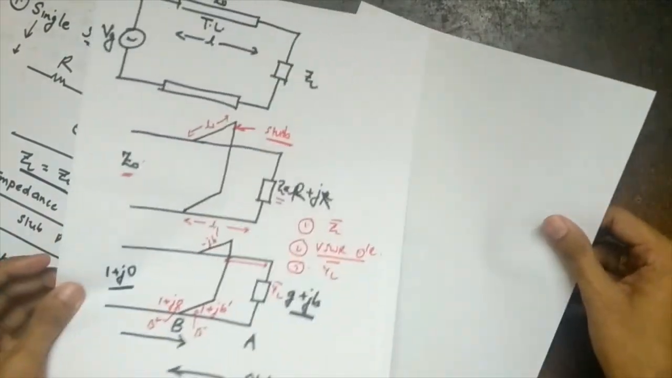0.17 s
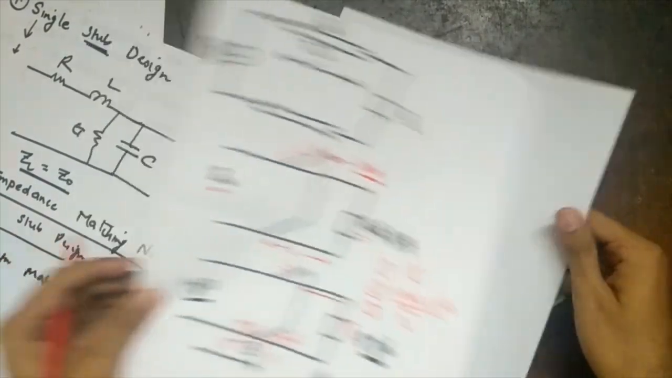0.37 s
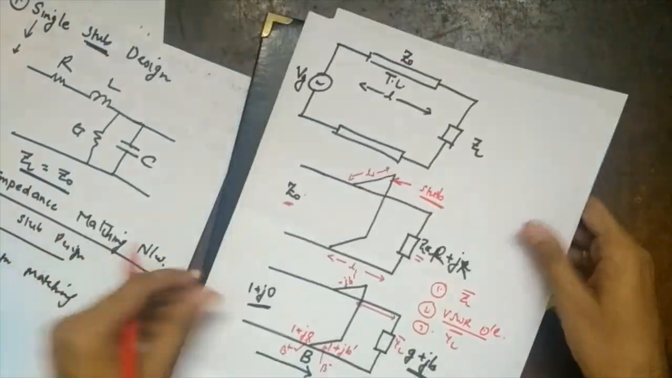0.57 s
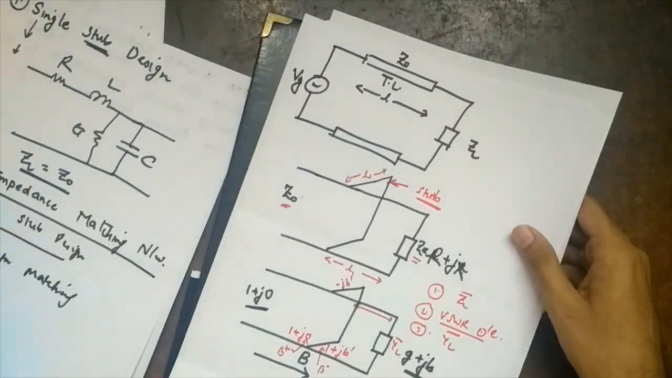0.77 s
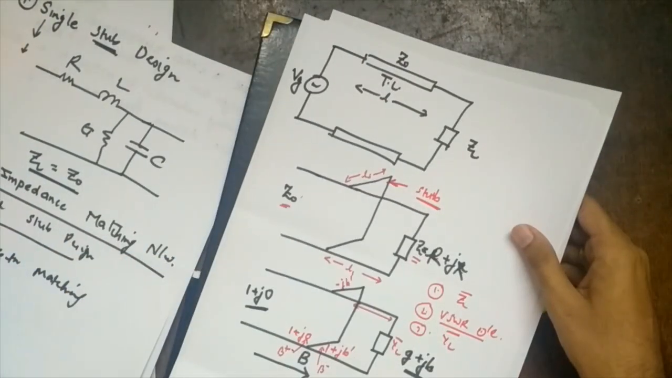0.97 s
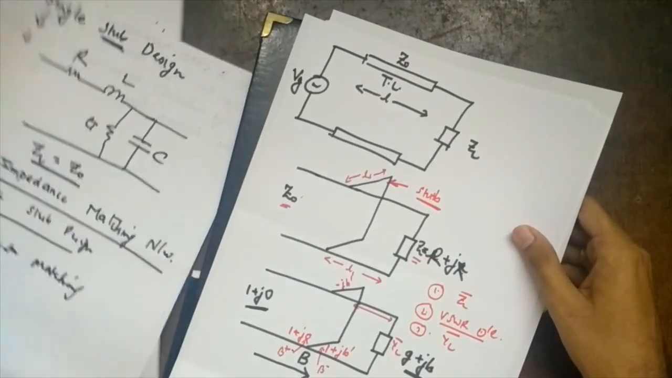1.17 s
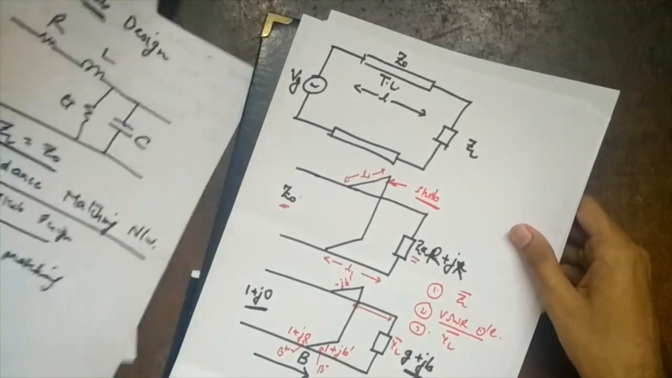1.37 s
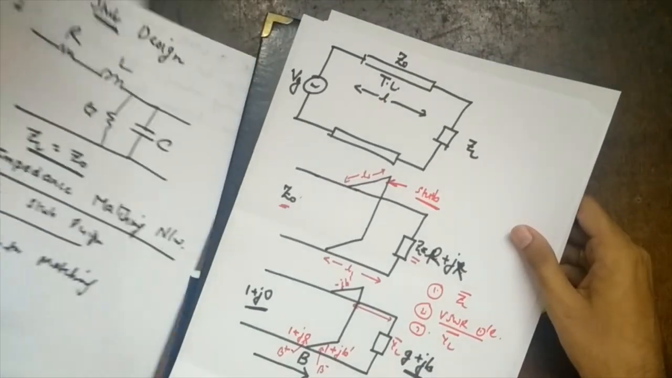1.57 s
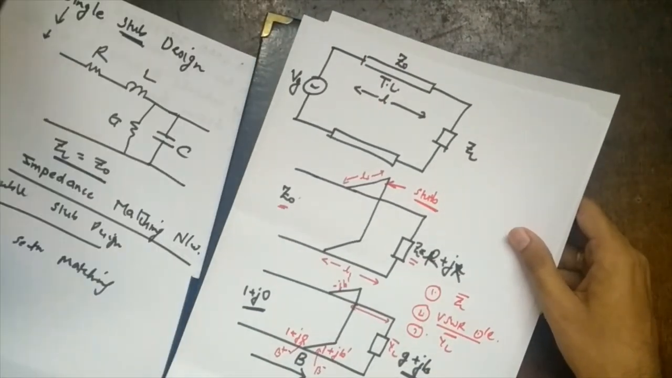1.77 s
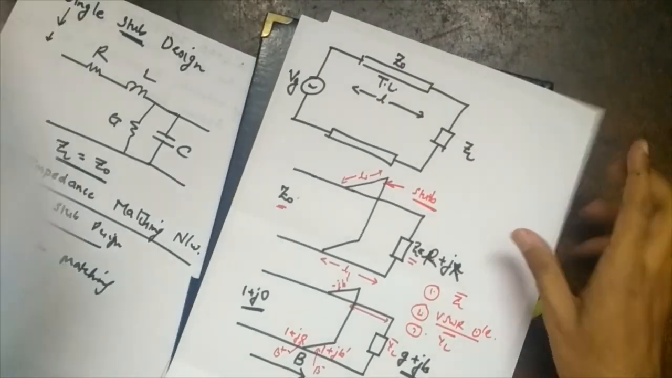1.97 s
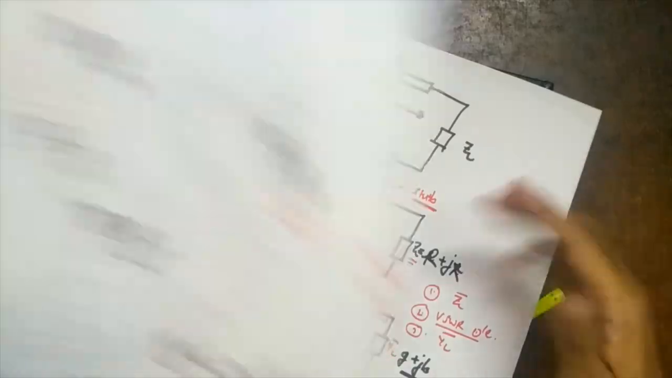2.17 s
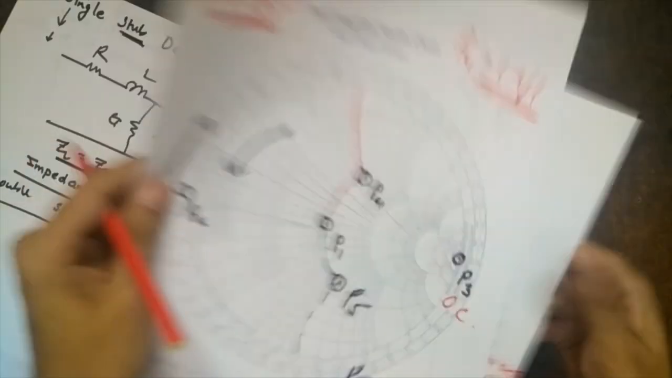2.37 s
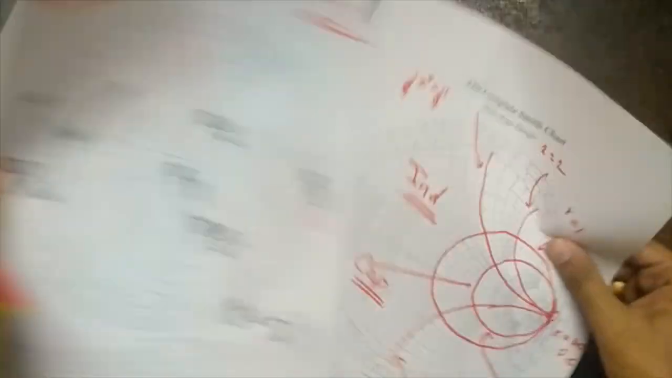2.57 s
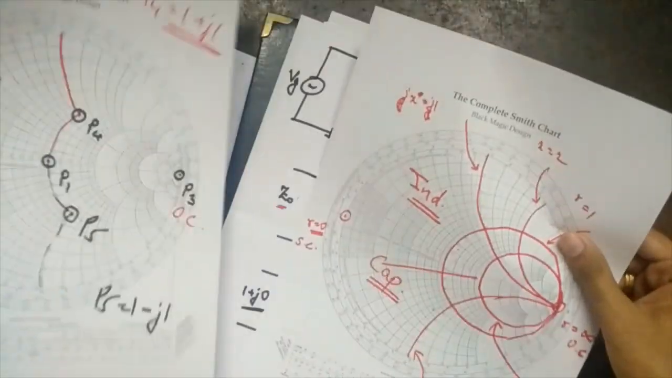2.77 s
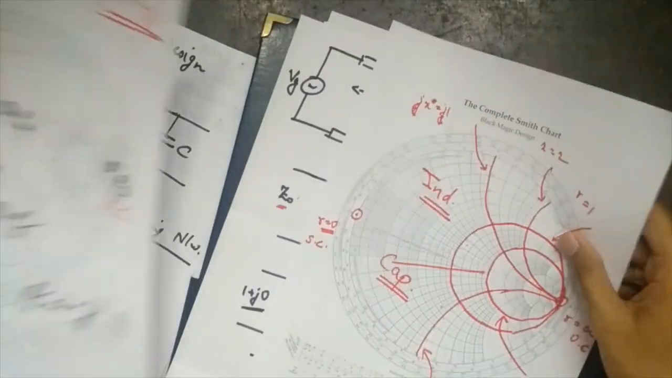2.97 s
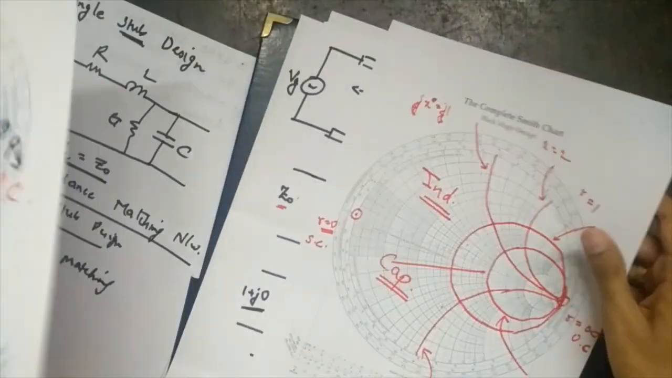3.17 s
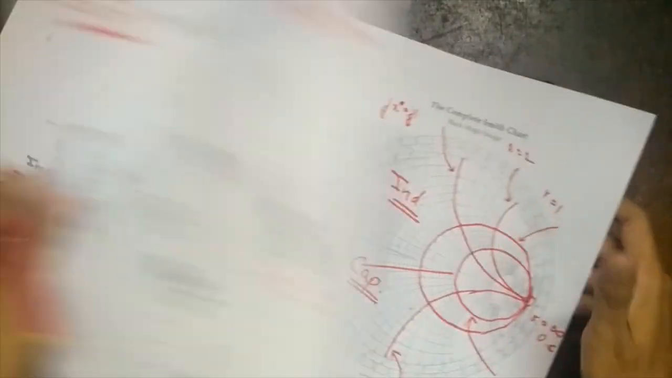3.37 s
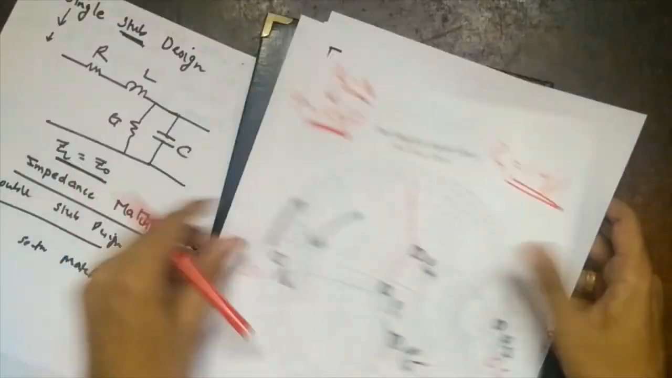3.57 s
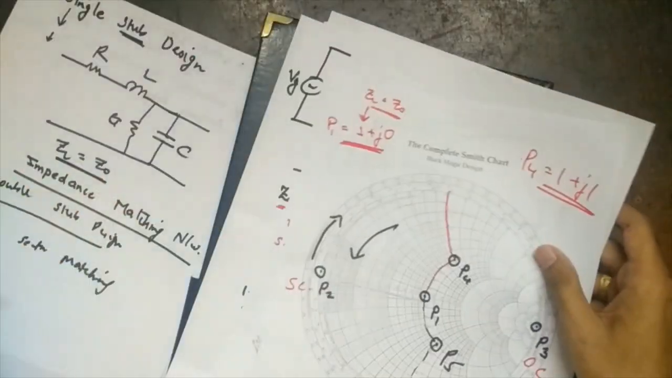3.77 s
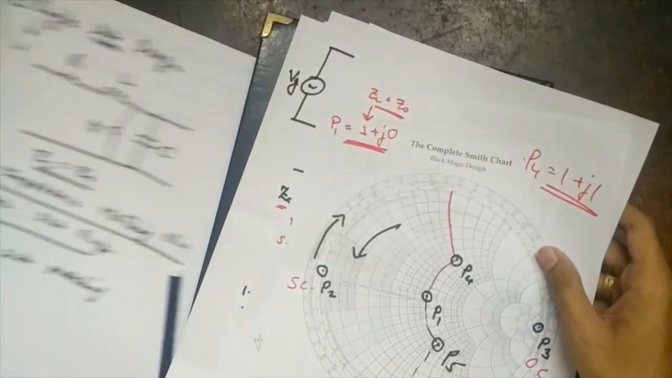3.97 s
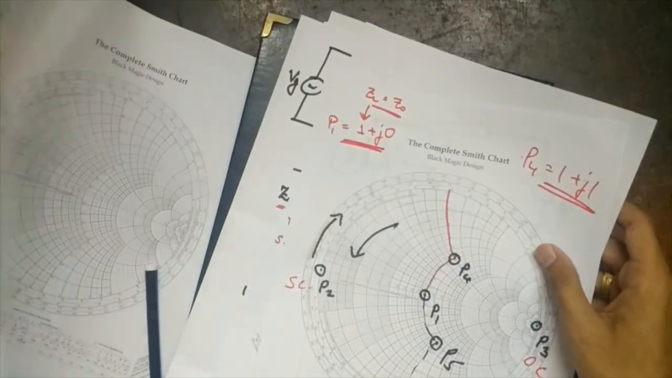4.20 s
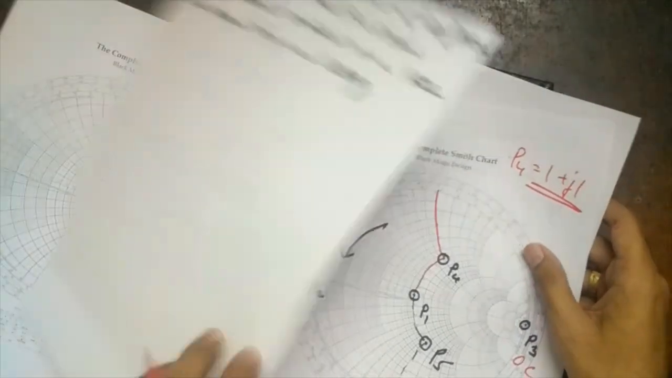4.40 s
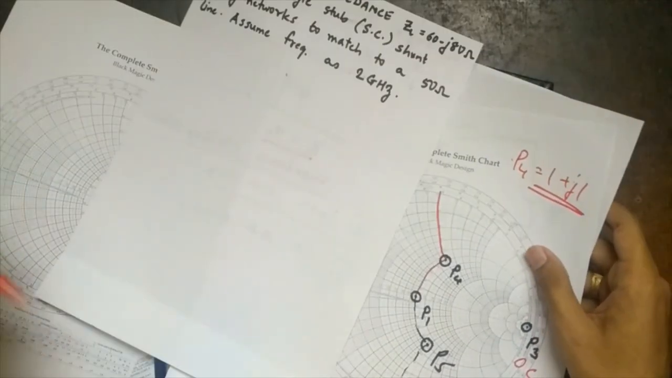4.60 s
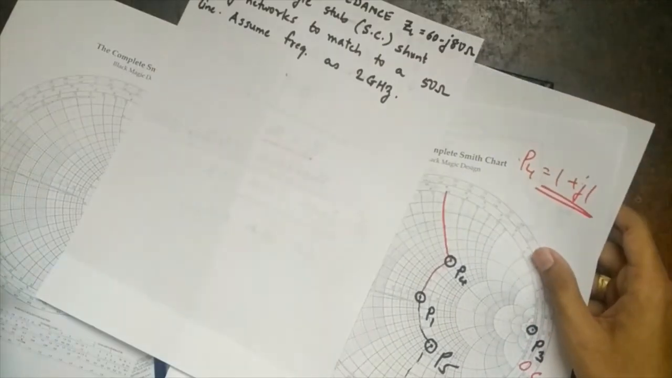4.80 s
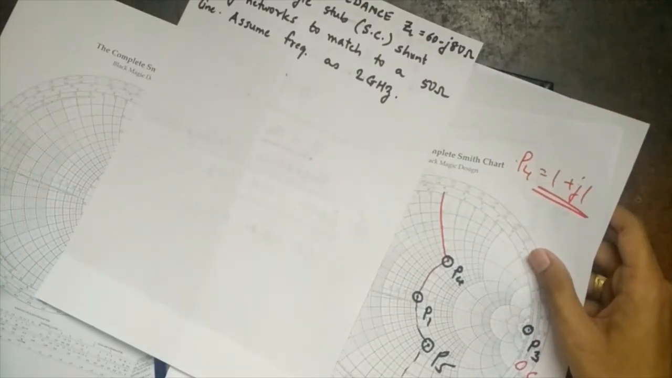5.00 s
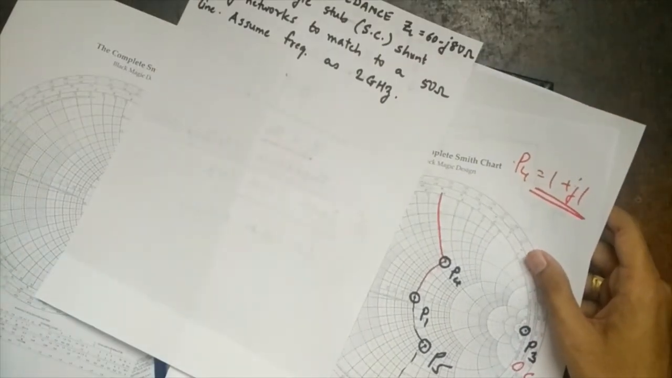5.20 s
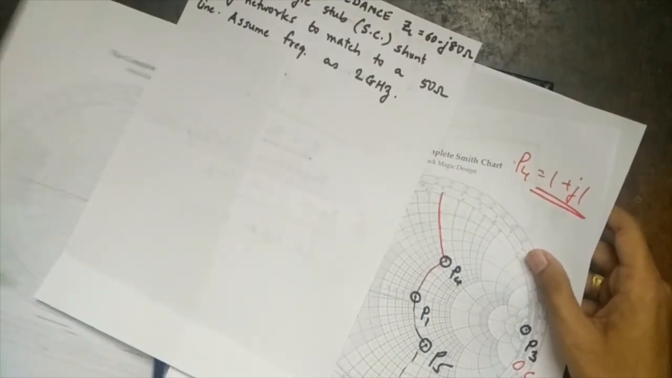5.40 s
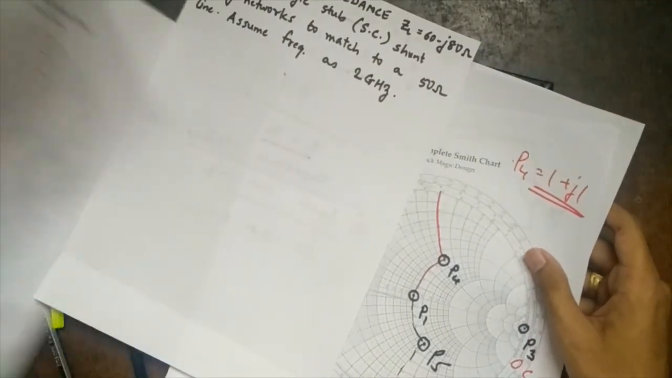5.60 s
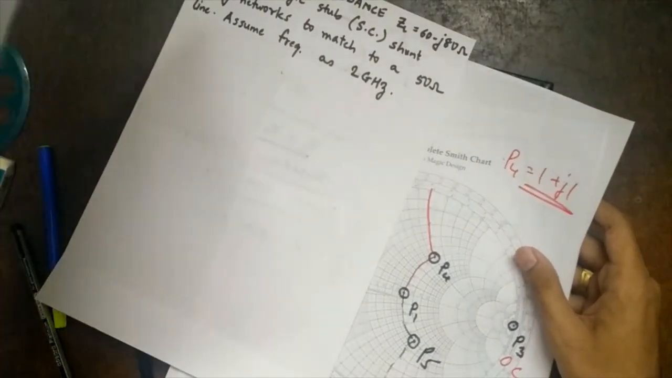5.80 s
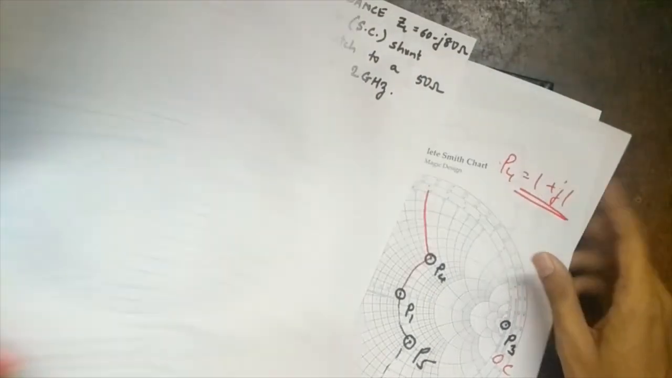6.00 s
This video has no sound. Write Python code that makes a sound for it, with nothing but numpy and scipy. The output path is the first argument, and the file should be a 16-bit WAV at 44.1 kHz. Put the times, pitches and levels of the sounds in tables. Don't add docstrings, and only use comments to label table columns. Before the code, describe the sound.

Close paper shuffling: sharp crackles and airy treble rustles come in bursts, with soft desk thuds and quiet gaps over faint room noise.

```python
import sys
import numpy as np
from scipy import signal
from scipy.fft import rfft, irfft, next_fast_len
from scipy.io import wavfile
from scipy.ndimage import uniform_filter1d

SR = 44100
rng = np.random.default_rng(int(sys.argv[2]) if len(sys.argv) > 2 else 0)


def wav_out(sig):
    wavfile.write(sys.argv[1], SR, np.round(np.clip(np.atleast_2d(sig).T, -1, 1) * 32767).astype(np.int16))


def elevation(decibels):
    levels = np.asarray(decibels, float)
    return 10 ** (levels / 20)


N = 266805

RUB_EDGES_HZ = [5000, 7700, 9500, 12700, 15800]
FLEX_EDGES_HZ = [5000, 3300, 2000, 1000, 330]


def rub():
    # pitch_hz, level_db
    microphone = [(4000, 2.5), (5000, 3.5), (5700, 0.5), (7000, -2), (12500, -0.5), (13500, -8.5),
                  (15800, -2.5)]
    drive = slips(per_s=4300, spread_db=3.0, clump_db=1.35, smooth=1.3, clump_s=0.012)
    return banded(coloured(drive, microphone), rubbing(), RUB_EDGES_HZ, patchy_db=2.5, soft=2)


def rubbing():
    # start_s, level_db, fall_20db_s, tilt_db_per_octave
    rub_flicks = [(0.0, -47.5, 0.2911, -2.5), (.385, -54, 0.2555, -16), (1.145, -57, 0.12, -6.5),
                  (1.375, -52.5, 0.18, -4), (2.405, -58, -0.4, 2), (2.472, -44.5, 0.0646, -1.5),
                  (2.645, -44.5, 0.17, 3), (2.944, -56.5, 0.22, 3), (3.11, -53, 0.09, 3),
                  (3.585, -56.5, 0.15, -9), (3.932, -56, 0.19, 8.5), (4.425, -44.5, 0.0943, -13),
                  (4.552, -43.5, 0.04, 3), (4.823, -69.5, 0.1, 3), (5.12, -55, 0.17, 3.5),
                  (5.369, -49.5, 0.14, -3.5), (4.595, -52, 0.04, 4), (6.004, -70.5, -2, 3)]
    # top_speed_s, level_db, rise_20db_s, fall_20db_s, tilt_db_per_octave
    rub_slides = [(.33, -56, 0.09, 0.03, -10), (.24, -58, 5, 0.13, -19.5), (1.035, -63.5, .025, 0.25, -4),
                  (1.28, -52.5, 0.0245, 0.11, 4), (3.842, -61.5, -0.04, 0.2, 0),
                  (5.278, -56, 0.04, 0.04, 1.5), (2.02, -59.5, 0.1935, 0.0114, 2),
                  (0.041, -42.5, 5, 0.1735, 4.5), (0.507, -39.5, 0.0666, 0.112, -1),
                  (.6, -54.5, 0.5, 0.0846, -7.5), (1.061, -59.5, 0.0187, 0.15, 3.5),
                  (1.21, -57, 0.0422, 0.28, -25), (1.468, -49.5, 0.0842, 0.17, 0),
                  (1.762, -45, 0.1038, 0.14, 8), (1.891, -43, 0.152, 0.0863, 0),
                  (2.241, -74.5, 0.16, 0.12, -1), (2.455, -57.5, 0.0313, -0.2, 0),
                  (2.544, -41.5, 0.09, 0.1062, 0.5), (2.765, -53.5, .08, -0.01, -1.5),
                  (2.989, -54, -0.09, 0.15, -2), (3.345, -55, 0.03, 0.296, -12.5),
                  (3.49, -59.5, 0.24, .07, -20), (3.745, -66, 0.04, 0.15, -8.5),
                  (3.876, -57, -0.05, 0.14, -1), (3.96, -52.5, -0.02, 0.11, 5),
                  (4.1, -53.5, 0.1513, 0.15, 9.5), (4.202, -50.5, 0.145, 0.08, 12),
                  (5.422, -44, 0.04, 0.0952, -2), (5.63, -42.5, 0.1738, 0.1341, -1),
                  (5.73, -45, 0.0736, 0.0754, -0.5), (5.955, -68, 0.3, -0.01, -2)]
    rub_bands_db = [-0.5, -3, -2.5, -7.5]
    return strokes(rub_flicks, rub_slides, rub_bands_db, RUB_EDGES_HZ, dulls_db=4.5)


def slips(per_s, spread_db, clump_db, smooth, clump_s):
    width = int(clump_s * SR)
    clumps = evened(uniform_filter1d(uniform_filter1d(rng.standard_normal(N), width), width))
    size = elevation(spread_db * np.minimum(rng.exponential(1, N), 4))
    clicks = size * rng.choice([-1., 1.], N) * (rng.random(N) < per_s / SR)
    return elevation(clump_db * clumps) * (evened(clicks) + smooth * rng.standard_normal(N))


def strokes(flicks, slides, bands_db, edges_hz, dulls_db):
    t = np.arange(N // 64 + 5) * 64 / SR
    rise_s = 0.0051
    sudden = [(s, db, rise_s, fall_s, tilt) for s, db, fall_s, tilt in flicks]
    down_db = np.vstack([fading(sudden, t, bend=1.13), fading(slides, t, bend=1.22)])
    rows = np.array([row[1::3] for row in sudden + slides])
    centres = np.multiply(edges_hz[1:], edges_hz[:-1])
    octaves = np.log2(centres / edges_hz[0] / edges_hz[1])[:, None, None] / 2
    tilt = rows[:, 1:] - dulls_db * np.minimum(down_db, 60) / 20
    shares = elevation(2 * (np.array(bands_db)[:, None, None] + tilt * octaves))
    power = elevation(2 * np.maximum(rows[:, :1] - down_db, -150))
    return (shares / shares.sum(0) * power).sum(1)


def fading(rows, t, bend):
    s, rise_s, fall_s = (np.array([row[k] for row in rows])[:, None] for k in (0, 2, 3))
    return 20 * abs((t - s) / np.where(t < s, abs(rise_s), abs(fall_s))) ** bend


def banded(drive, shares, edges_hz, patchy_db, soft):
    hz, t, z = signal.stft(drive, SR, nperseg=256, noverlap=192)
    power = np.zeros(z.shape)
    for share, a, b in zip(shares, edges_hz, edges_hz[1:]):
        inside = (hz >= min(a, b)) & (hz < max(a, b))
        power[inside] = share[:len(t)] * SR / 2 / abs(b - a)
    patches = uniform_filter1d(rng.standard_normal(z.shape), 4, 0)
    patches = evened(uniform_filter1d(uniform_filter1d(patches, 30, 1), 30, 1))
    gain = np.sqrt(abs(uniform_filter1d(power, soft, 0))) * elevation(patchy_db * patches)
    return signal.istft(z * gain, SR, nperseg=256, noverlap=192)[1][:N]


def flex():
    # start_s, level_db, fall_20db_s, tilt_db_per_octave
    flex_flicks = [(0.0, -58, 0.1078, -1), (.385, -45, 0.0637, 6), (1.14, -54, 0.03, 3.5),
                   (1.268, -60, 0.186, -1.5), (2.208, -64, -0.02, -9.5), (2.472, -46, 0.0374, -3.5),
                   (2.643, -56, 0.067, -3), (2.8, -63.5, .04, -4.5), (2.945, -65.5, 0.26, 3.5),
                   (3.296, -57.5, 0.1, 2), (3.581, -55.5, 0.06, -3), (4.356, -70, .05, -2),
                   (4.426, -42.5, 0.0624, 2.5), (3.567, -57, 0.01, -3), (4.557, -57.5, 0.11, 0.5),
                   (5.122, -66, 0, 2), (5.271, -63.5, -0.1, 4), (5.382, -55, 0.08, 10),
                   (5.367, -57, 0.06, 1), (1.805, -53.5, 0.09, 1), (.749, -67.5, 0.08, 0),
                   (5.46, -56.5, 0, 6.5)]
    # most_bent_s, level_db, rise_20db_s, fall_20db_s, tilt_db_per_octave
    flex_slides = [(.12, -60.5, -4.25, 0.23, 14.5), (0.5203, -56, 0, 0.11, 3), (1.055, -65, 0.03, 0.14, -2),
                   (1.11, -68, 0.1, 0.16, 0.5), (1.3, -62.5, 0.13, .15, 4.5),
                   (1.8774, -47.5, 0.0832, 0.0924, 0.5), (2.44, -76, -1.5, -0.2, -8.5),
                   (2.537, -45, 0.052, 0.09, -4.5), (2.72, -61.5, 0.12, 0.13, 5.5),
                   (3.0, -60.5, 0.0366, 0.19, -3), (3.8, -67, 0.3, 0.26, 3), (3.98, -68, .1, 0.27, -2),
                   (4.21, -65, 0.3, 0.08, 3.5), (4.07, -67, 0.53, 0.32, -10.5),
                   (4.49, -54.5, 0.0744, 0.0054, 5), (4.895, -76.5, 0.5, 0.3, -1),
                   (5.69, -52.5, 0.13, 0.12, 1.5), (5.93, -65, 0.1442, -0.5, -4.5),
                   (4.4, -64.5, 0.04, .08, 5), (3.72, -73, 0.2, 0.3, -7), (2.6, -63, .015, 0.16, 2),
                   (1.706, -65.5, 0.16, 0.17, 1.5)]
    flex_bands_db = [0.5, -2, -4.5, -11.5]
    spill_db = [-13, -22.5, -29, -46]
    # pitch_hz, level_db
    notch = [(1000, -0.5), (4300, -1), (4800, -4.5)]
    drive = slips(per_s=1500, spread_db=3.0, clump_db=1.5, smooth=1.254, clump_s=0.0194)
    power = strokes(flex_flicks, flex_slides, flex_bands_db, FLEX_EDGES_HZ, dulls_db=2.5)
    power = power + elevation(2 * np.array(spill_db))[:, None] * rubbing()[0]
    return banded(coloured(drive, notch), power, FLEX_EDGES_HZ, patchy_db=2.5, soft=2)


def snaps():
    # start_s, peak_db, low_ring_hz, high_ring_hz, high_ring_db
    creases = [(0.371, -15.5, 2360, 3800, 1.5), (0.505, -32.5, 2760, 5800, 10.5),
               (.2224, -44, 3520, 6000, 8), (.3027, -47, 2990, 5830, 4.5), (1.0679, -48, 2500, 6020, 1.5),
               (2.077, -60, 3200, 7000, -2), (1.552, -46, 3020, 5550, 10), (1.135, -26, 2370, 4930, 17.5),
               (1.803, -38, 2620, 5400, 3), (1.855, -31.5, 2860, 5400, -7.5), (2.468, -28, 640, 3670, -13),
               (2.526, -29, 794, 2200, -2.5), (2.535, -21.5, 1320, 3104, -4.5),
               (2.641, -37, 1208, 6160, -5), (2.944, -50, 4260, 3210, -5), (3.108, -49, 573.3, 10000, -3),
               (3.293, -37, 2170, 3143, -4), (3.576, -27, 1682, 2720, -7), (4.418, -17, 2053, 4250, 2),
               (4.547, -28, 3200, 8410, 23.5), (5.123, -44.5, 567, 9900, 13.5),
               (5.381, -29, 2800, 6500, -8), (5.388, -28.5, 3000, 4400, 0.5), (5.54, -39, 5470, 9000, 1)]
    # start_s, peak_db, ring_hz
    ticks = [(0.747, -47, 2866), (1.046, -49.5, 1820), (1.273, -42.5, 1647), (2.143, -58, 1140),
             (2.209, -54, 1274), (2.8, -52, 1284), (2.48, -34, 900), (2.505, -39, 760),
             (3.566, -51.5, 1000), (3.5705, -40.5, 1010), (3.5734, -40, 900), (3.583, -43.5, 885),
             (4.431, -33.5, 2050), (4.447, -35, 1300), (5.369, -43, 1420), (5.934, -49, 1130),
             (1.132, -45.5, 1216), (2.549, -33, 2290), (2.563, -40, 1700), (4.686, -53, 1900),
             (5.677, -49.5, 1190), (5.78, -49, 1090), (5.887, -59, 1165), (6.004, -47.5, 1123)]
    tick_high_hz, tick_high_db = 5070, -27.5
    direct, feed, t = np.zeros(N + 1000), np.zeros(N + 1000), np.arange(800) / SR
    events = creases + [(*row, tick_high_hz, tick_high_db) for row in ticks]
    for s, peak_db, low_hz, high_hz, high_db in events:
        snap = crease_ring(t, low_hz, high_hz, high_db)
        at = round((s - .0002) * SR)
        creak = evened(resonate(rng.standard_normal(len(t)), low_hz, 0.67 * low_hz))
        creak *= np.exp((t - t[-1]) / .0015)
        direct[at - len(t):at] += elevation(peak_db - 23.5) * creak
        direct[at:at + len(t)] += elevation(peak_db) * snap
        tail_db = -11 - 0.2253 * (peak_db + 31.5)
        feed[at:at + len(t)] += elevation(peak_db + tail_db) * snap
    return direct[:N], feed[:N]


def crease_ring(t, low_hz, high_hz, high_db):
    # pitch_hz, density_db_per_hz
    crack_tone = [(300, -19), (1500, -5), (4000, 7.5), (8000, -1.5), (15500, -19.5)]
    attack = (t / .0006) ** 2
    burst = rng.standard_normal(len(t)) * attack * np.exp(-t / 0.0004)
    low = resonate(resonate(burst, low_hz, 0.32 * low_hz), low_hz, 1.3 * low_hz)
    high = resonate(burst, high_hz, 0.129 * high_hz)
    rings = peaked(low) + elevation(high_db) * peaked(high)
    crack = coloured(rng.standard_normal(len(t)), crack_tone) * attack * np.exp(-t / 0.001785)
    crack = signal.lfilter(*signal.butter(2, .6 * low_hz, "highpass", fs=SR), crack)
    snap = rings + elevation(high_db - 7.0) * peaked(crack)
    snap = signal.lfilter(*signal.butter(2, 0.44 * low_hz, "highpass", fs=SR), snap)
    return peaked(signal.lfilter(*signal.butter(4, 11500, fs=SR), snap))


def ridges():
    # start_s, length_s, pitch_hz, width_hz, level_db
    patches = [(0.2, 0.17, 5600, 900, -60.5), (1.025, 0.083, 10800, 2500, -61), (1.1, .07, 5400, 700, -53),
               (1.59, 0.0787, 6220, 2000, -61), (1.731, 0.11, 10000, 2000, -50),
               (2.648, 0.046, 8500, 3700, -45), (3.108, 0.026, 10000, 1100, -54.5),
               (3.3, 0.19, 5420, 570, -59), (3.44, 0.1345, 5500, 560, -62), (3.588, 0.16, 5700, 800, -63.5),
               (3.845, 0.0636, 6900, 1300, -60.5), (3.933, 0.047, 8600, 3300, -48),
               (4.09, .14, 10400, 1700, -54), (4.817, 0.086, 14000, 2200, -73),
               (5.268, .02, 9400, 3000, -50), (5.372, .05, 4500, 2500, -50),
               (5.439, 0.15, 5740, 980, -54.5), (5.59, .15, 8770, 1800, -44.5),
               (5.92, 0.0638, 5560, 890, -64), (1.798, 0.11, 7540, 3700, -47.5),
               (.01, 0.11, 9500, 3500, -50), (2.951, 0.0516, 8900, 3000, -57),
               (1.374, 0.036, 11400, 2000, -58), (1.44, .07, 7300, 2000, -55), (5.375, .06, 3000, 770, -47),
               (4.44, .1, 5450, 790, -55.5), (4.0, .26, 5640, 900, -63.5), (.1, 0.1, 4050, 700, -59.5),
               (.31, 0.043, 8500, 3500, -59), (4.46, .07, 2700, 900, -59)]
    out = np.zeros(N)
    for s, length, hz, width, db in patches:
        arch = np.sin(np.linspace(0, np.pi, round(length * SR))).clip(0) ** 0.76
        hiss = resonate(resonate(rng.standard_normal(12000), hz, width), hz, width)
        out[round(s * SR):][:len(arch)] += elevation(db) * evened(hiss[-len(arch):]) * arch
    return out


def pockets():
    # start_s, length_s, pitch_hz, width_hz, level_db
    cavities = [(1.258, 0.065, 1665, 480, -45.5), (2.327, 0.1367, 365, 100, -59),
                (2.672, 0.0654, 1260, 230, -47.5), (2.932, 0.19, 528, 211, -54),
                (2.6, 0.082, 1300, 130, -60.5), (4.416, 0.037, 480, 157.5, -47),
                (5.371, 0.052, 108.3, 36, -41.5), (5.45, 0.049, 795, 86, -61.5),
                (5.673, 0.021, 1289, 240, -39), (5.701, 0.0573, 1210, 250, -52.5),
                (5.873, 0.081, 1165, 225, -50.5), (5.143, 0.046, 3000, 850, -55.5),
                (4.848, 0.057, 2690, 690, -66), (3.838, 0.076, 3400, 900, -57),
                (4.416, 0.032, 1206, 320, -42), (2.468, .045, 730, 550, -43.5),
                (2.545, .04, 900, 810, -43.5), (3.575, 0.046, 750, 465, -56), (1.7, .06, 190, 49, -62.5),
                (5.844, 0.11, 290, 34, -64.5), (2.64, 0.066, 390, 120, -55.5),
                (5.82, .03, 1120, 220, -53.5), (.02, .05, 470, 180, -59), (2.47, .05, 520, 200, -47),
                (2.46, .07, 60, 39, -55), (5.7, .05, 87, 46, -64)]
    out = np.zeros(N)
    for s, length, hz, width, db in cavities:
        u = np.linspace(0, 1.4, round(1.3 * length * SR))
        tone = resonate(resonate(rng.standard_normal(12000), hz, width), hz, width)
        swell = np.clip(u / 0.31, 0, 1) * np.clip((1.4 - u) / 2.07, 0, 1)
        out[round(s * SR):][:len(u)] += elevation(db) * evened(tone[-len(u):]) * swell
    return out


def knocks():
    # start_s, peak_db, ring_hz
    blows = [(2.143, -53, 1100), (2.209, -46, 1280), (2.536, -32.5, 595), (2.8, -47.5, 1290),
             (4.4187, -30, 520), (4.4185, -27, 1170), (4.419, -27, 3200), (4.551, -37.5, 3020),
             (5.886, -51, 1130), (6.004, -48, 1120), (3.293, -38.5, 2130)]
    out, t = np.zeros(N + 1000), np.arange(800) / SR
    for s, peak_db, hz in blows:
        blow = t * np.exp(-t * hz / 0.12)
        width = 0.27 * hz
        ring = resonate(resonate(blow, hz, width), hz, 2 * width)
        out[round((s - .0005) * SR):][:len(t)] += elevation(peak_db) * peaked(ring)
    return out[:N]


def thud():
    # start_s, level_db, rise_20db_s, fall_20db_s
    pushes = [(.21, -65, .06, .08), (1.06, -64.5, -0.7, 0.23), (1.14, -55, -0.13, 0.14),
              (1.25, -67, -0.1, 0.31), (1.92, -68, -0.4, -0.2), (2.36, -67.5, -1, 0.4),
              (2.49, -48, -0.02, .08), (2.57, -58, 0, .08), (2.73, -69, .1, .1), (2.92, -65, .08, -0.2),
              (3.04, -67.5, 0.17, -0.1), (3.63, -62.5, 0, 0.14), (3.735, -67, .06, -0.07),
              (4.41, -66, .06, 0.14), (5.28, -60, -0.1, 0.18), (5.39, -46, 0.0166, 0.1571),
              (5.57, -61, .1, 0.2), (5.73, -60, .04, .06), (5.92, -66, 0.1, -0.5)]
    # pitch_hz, density_db_per_hz
    desk_tone = [(21, -42), (35, -3), (108, -3), (131, -6.5), (177, -17.5), (220, -17.5), (350, -14),
                 (460, -27.5), (770, -120)]
    rest_db = -76
    down_db = fading(pushes, np.arange(N) / SR, bend=0.865)
    power = elevation(2 * (np.array(pushes)[:, 1:2] - down_db)).sum(0) + elevation(2 * rest_db)
    return elevation(-3.5) * np.sqrt(power) * coloured(rng.standard_normal(N), desk_tone)


def rustle():
    rustle_db = [-89, -87, -91.5, -88, -83, -74.5]
    power = elevation(2 * np.array(rustle_db))[:, None] * np.ones(N // 64 + 5)
    edges_hz = [12700, 7700] + FLEX_EDGES_HZ
    return banded(rng.standard_normal(N), power, edges_hz, patchy_db=1.5, soft=3)


def room(x):
    # pitch_hz, t60_s
    decay = [(300, 0.27), (1500, 0.174), (5000, 0.22), (12000, 0.384)]
    hz, t, z = signal.stft(rng.standard_normal(SR // 2), SR, nperseg=256)
    tail = signal.istft(z * elevation(-60 * t / read(decay, hz)[:, None]), SR, nperseg=256)[1]
    tail *= np.clip((np.arange(len(tail)) / SR - .005) / 0.004, 0, 1)
    return signal.fftconvolve(x, 1.705 * tail / np.linalg.norm(tail))[:N]


def air():
    # pitch_hz, density_db_per_hz
    hiss_tone = [(12, -33), (20, -14), (113, 2), (345, 1.5), (496, 1), (570, 0), (1250, -33), (1510, -20),
                 (4630, -27.5), (5170, -27), (8790, -24), (12600, -25.5), (15800, -27)]
    # pitch_hz, width_hz, level_db
    fan = [(355.4, 2.2, -82), (567, 4.9, -78.5), (849, 2.2, -96)]
    drift, waver = (evened(uniform_filter1d(uniform_filter1d(rng.standard_normal(N), 3000), 3000))
                    for _ in range(2))
    hiss = elevation(-73 + 0.59 * drift) * coloured(rng.standard_normal(N), hiss_tone)
    hum_hz = 119 + 1.5 * drift
    hum = elevation(-76 + 2.5 * waver) * np.sin(2 * np.pi * np.cumsum(hum_hz) / SR)
    lines = sum(elevation(db) * evened(resonate(rng.standard_normal(N), hz, w)) for hz, w, db in fan)
    return hiss + hum + lines


def evened(x):
    return x / np.sqrt(np.mean(x ** 2) + 1e-20)


def peaked(x):
    return x / abs(x).max()


def read(points, hz):
    f, value = np.transpose(points)
    return np.interp(np.log(hz + 1), np.log(f + 1), value)


def coloured(x, points):
    size = next_fast_len(len(x))
    gain = elevation(read(points, np.fft.rfftfreq(size, 1 / SR)))
    return evened(irfft(rfft(x, size) * gain, size)[:len(x)])


def resonate(x, hz, width):
    r = np.exp(-np.pi * width / SR)
    return signal.lfilter([1, 0, -1], [1, -2 * r * np.cos(2 * np.pi * hz / SR), r * r], x)


def scene():
    direct, feed = snaps()
    paper = rub() + flex() + rustle() + pockets() + ridges()
    mono = paper + thud() + knocks() + direct + room(feed) + air()
    return np.array([mono, mono])


def band(x, lo, hi):
    sos = signal.butter(10, [lo, hi], "bandpass", fs=SR, output="sos")
    return signal.sosfiltfilt(sos, x, padtype="even", padlen=6000)


def starve(x):
    # centre_s, share_of_bands_kept
    starved = [(.391, .3), (.865, .15), (.95, .18), (1.185, .25), (1.418, .2), (1.78, .3), (2.165, .15),
               (2.698, .2), (2.762, .2), (2.975, .25), (3.232, .18), (3.338, .15), (3.98, .2), (4.278, .1),
               (4.745, .15), (5.13, .15), (5.237, .15), (5.432, .25), (5.44, .3), (5.447, .3), (5.492, .25),
               (5.898, .12)]
    out, size = x.copy(), 1050
    window = np.sqrt(signal.windows.tukey(size, .8))
    for s, share in starved:
        at = round(s * SR) - size // 2
        z = rfft(window * out[at:at + size])[:525]
        power_db = 10 * np.log10((abs(z) ** 2).reshape(-1, 3).mean(1) + 1e-18)
        stands_db = power_db - .55 * uniform_filter1d(power_db, 17)
        gain = np.where(stands_db > np.quantile(stands_db[:125], 1 - share), 1.2, .07)
        out[at:at + size] += window * irfft(z * (np.repeat(gain, 3) - 1), size)
    return out


def drop_quiet_top(x):
    quiet_hz, quiet_db = 13330, -112
    hz, t, z = signal.stft(x, SR, nperseg=1024, noverlap=512, window="cosine")
    power_db = 10 * np.log10(abs(uniform_filter1d(abs(z) ** 2, 8, 0)) + 1e-18)
    gate = 1 / (0.5 + np.exp(np.clip(quiet_db - power_db, -30, 30)))
    kept = np.where(hz[:, None] > quiet_hz, gate, 1)
    return signal.istft(z * kept, SR, nperseg=1024, noverlap=512, window="cosine")[1][:N]


def low_pass(x):
    return signal.sosfilt(signal.butter(12, 16690, fs=SR, output="sos"), x)


def record(dry):
    mono = drop_quiet_top(starve(band(dry[0], 34, 15550)))
    return low_pass(np.array([mono, mono]))


dry = scene()
out = record(dry)
wav_out(out)
```